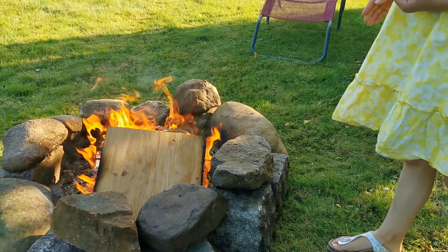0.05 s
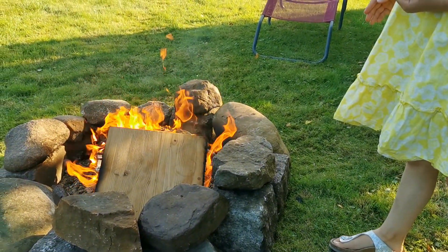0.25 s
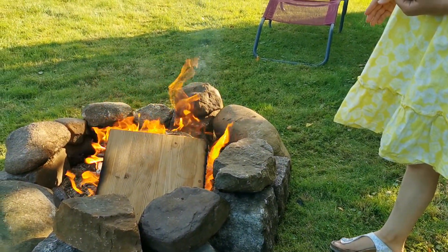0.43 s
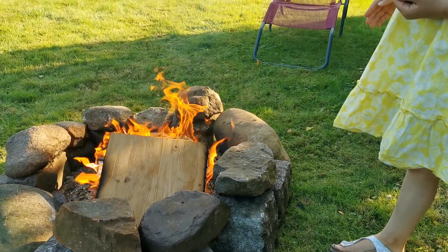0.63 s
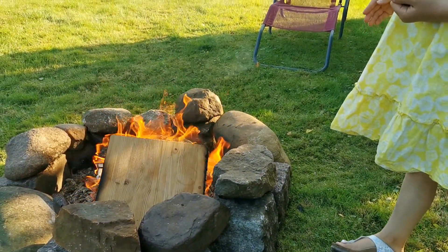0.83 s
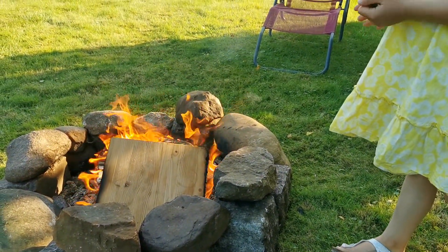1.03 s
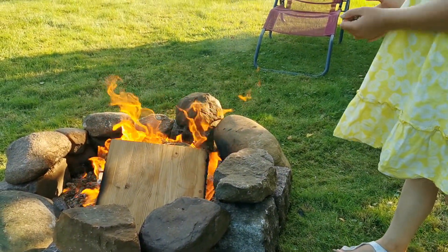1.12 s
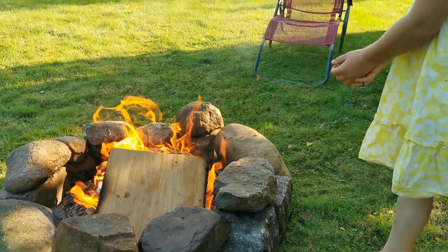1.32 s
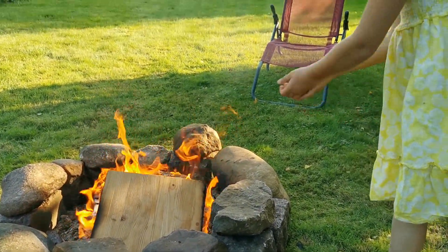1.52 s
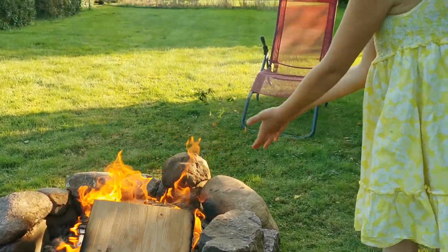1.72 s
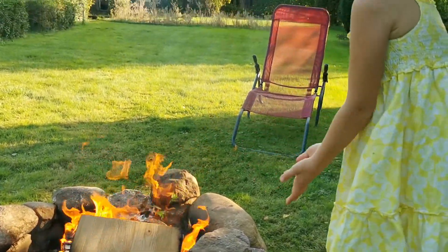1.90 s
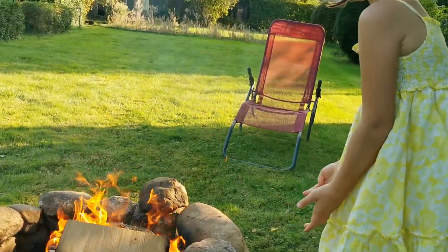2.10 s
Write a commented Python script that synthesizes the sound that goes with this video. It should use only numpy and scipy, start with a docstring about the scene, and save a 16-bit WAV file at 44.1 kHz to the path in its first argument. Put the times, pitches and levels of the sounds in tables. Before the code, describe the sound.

A wood fire crackles outdoors, with five loud snaps over low fluttering flames.

```python
"""Wood burns in a stone fire pit on a lawn, a couple of metres from the microphone.
Low fluttering flames and faint outdoor air sound throughout. Right at the start a puff of wind
bumps the microphone and small crackles begin to tick. Then steam splits the wood in five loud snaps:
each rattles briefly between the stones and comes back from the garden as a soft hiss.
A few of the thin ticks that follow are sharp, far echoes of the snaps."""
import sys
import numpy as np
from scipy import signal
from scipy.fft import rfft, irfft
from scipy.io import wavfile
from scipy.ndimage import uniform_filter1d

SR = 44100
rng = np.random.default_rng(int(sys.argv[2]) if len(sys.argv) > 2 else 0)


def unload_wav(signal):
    """Save mono or channel-first audio to the path in sys.argv[1] as 16-bit WAV at rate SR, clipped to [-1, 1]."""
    wavfile.write(
        sys.argv[1],
        SR,
        np.round(np.clip(np.atleast_2d(signal).T, -1, 1) * 32767).astype(np.int16),
    )


N = 94815
CRACK_SAMPLES, LEAD_S = 2048, 128 / SR  # a crack's length, and the quiet lead-in before it hits
CRACK_HZ = np.fft.rfftfreq(CRACK_SAMPLES, 1 / SR)


def amp(db):
    """Turns decibels into a gain."""
    return 10 ** (np.asarray(db) / 20)


def look_up(table, hz):
    """Reads a table at any pitch, drawing straight lines between its rows on a log scale."""
    pitch_hz, *columns = np.transpose(table)
    return np.array([np.interp(np.log(hz + 1), np.log(pitch_hz + 1), c) for c in columns])


def unit_level(x):
    """Scales a signal to an average (rms) level of 1."""
    return x / np.sqrt(np.mean(x ** 2) + 1e-20)


def add(mix, start_s, sound):
    """Mixes a stereo sound in at a given time."""
    part = mix[:, max(round(start_s * SR), 0):][:, :sound.shape[1]]
    part += sound[:, :part.shape[1]]


# The tone of the flames and air: pitch_hz, left_db, right_db
AIR_TONE = [(20, -37, -36.5), (45, -34.5, -37.5), (80, -38.5, -38.5), (130, -40.5, -40.5),
            (231.8, -44.5, -44), (332, -56, -59), (450, -61.5, -55.5), (800, -58.5, -55.5),
            (1400, -68.5, -62.5), (2800, -70, -64), (4200, -69, -69.5), (6700, -68, -65),
            (8000, -73, -77.5), (11000, -77, -68.5), (15500, -79.5, -67.5)]
# How alike the two sides sound: pitch_hz, likeness (0 to 1)
AIR_LIKENESS = [(25, 1), (60, .77), (130, 1), (290, 0.88), (640, .28), (1400, 0)]
# How the low rumble rises and falls: time_s, boost_db
RUMBLE_SWELLS = [(0, 4.5), (.2, 3), (.35, -3), (.9, -1), (1.2, -3), (1.5, 0.5), (1.8, -7), (2.0, 3),
                 (2.15, 1.5)]

def flames_and_air():
    """Flames make a fluttering rumble, alike on both sides, under the faint hiss of the air."""
    hz, t, noise = signal.stft(rng.standard_normal((2, N)), SR, nperseg=1024, noverlap=768)
    likeness = look_up(AIR_LIKENESS, hz).T
    noise[1] = likeness * noise[0] + np.sqrt(1 - likeness ** 2) * noise[1]
    flutter = uniform_filter1d(rng.standard_normal(noise.shape[1:]), size=6, axis=1)  # smooth in time
    flutter_db = 1.66 * unit_level(uniform_filter1d(flutter, size=5, axis=0))  # and in pitch
    swell_db = np.interp(t, *np.transpose(RUMBLE_SWELLS))
    bass_only = 1 / (1 + (hz[:, None] / 360) ** 2)
    level_db = look_up(AIR_TONE, hz)[:, :, None] + bass_only * (flutter_db + swell_db)
    return signal.istft(noise * amp(level_db), SR, nperseg=1024, noverlap=768)[1][:, :N]


def wind_puff(peak_s=0.058, width_s=0.039, pitch_hz=43.6, left_db=-50, right_db=-39):
    """Wind bumps the microphone: a short, deep rumble, different on each side."""
    t, hz = np.arange(N) / SR, np.fft.rfftfreq(N, 1 / SR)
    noise = rfft(rng.standard_normal((2, N)))
    rumble = irfft(noise * hz / (1 + (hz / pitch_hz) ** 4), N)
    swell = np.exp(-((t - peak_s) / width_s) ** 2)
    return unit_level(rumble) * swell * amp([[left_db], [right_db]])


def quick_filter(tone_db):
    """The filter with this tone that rings most briefly (minimum phase)."""
    cepstrum = irfft(np.log(amp(tone_db)))
    cepstrum[..., 1:CRACK_SAMPLES // 2] *= 2
    cepstrum[..., CRACK_SAMPLES // 2 + 1:] = 0
    return np.exp(rfft(cepstrum))


# How the stone pit colours each crack: pitch_hz, left_db, right_db
PIT_TONE = [(80, -20.5, -23.5), (235, -8.5, -7.5), (395, -29.5, -24), (640, -5.5, 0.5), (1072, 5, 4),
            (1380, -11.5, -6), (1580, -8.5, 2.5), (1960, -0.5, -11), (2350, -11, 6.5), (2650, -0.5, -9.5),
            (3000, -6.5, 2), (4500, 1.5, 3), (5500, 2.2, 6), (6700, -3.5, 5.5), (7500, -0.5, -7.64),
            (8910, -2, -2.5), (10600, -15, 4.5), (12730, -19.5, -0.9), (15500, -14, -3)]

def wood_crack(tone_db, tear_s=0.00041, rattle_s=0.0013, bounce_s=0.00148, right_lag_s=0.0001):
    """A jump in pressure and tearing fibres, scattered by the stones, with one bounce."""
    t, hz = np.arange(CRACK_SAMPLES) / SR, CRACK_HZ
    tear = t / tear_s * np.exp(1 - t / tear_s)
    rattle = amp(-5.5) * np.exp(-t / rattle_s)
    shape = tear + rattle
    scatter = rfft(rng.standard_normal((2, CRACK_SAMPLES)) * shape / np.linalg.norm(shape))
    bass_cut = (1j * hz / (2330 + 1j * hz)) ** 2
    burst = 1 + amp(10.5) * scatter * bass_cut  # the 1 is the jump in pressure
    # Even out the burst's own tone, so the pit and tone_db set the colour.
    power = uniform_filter1d(abs(burst) ** 2, round(405.5 / hz[1]), axis=1)
    colour = quick_filter(look_up(PIT_TONE, hz) + tone_db - 10 * np.log10(power + 1e-9))
    bounce = 1 - 0.2 * np.exp(-2j * np.pi * hz * bounce_s)
    delay = np.exp(-2j * np.pi * hz * (LEAD_S + np.array([[0], [right_lag_s]])))
    return irfft(burst * bounce * delay * colour)


# Small crackles in the wood and sharp far echoes of the snaps: start_s, level_db, pitch_hz
THIN_TICKS = [(0.03, -23, 10000), (0.0438, -37.5, 9000), (.5380, -19.5, 5180), (.5515, -28.5, 4920),
              (0.7247, -35.5, 12020), (0.891, -38.5, 6960), (0.9043, -41.5, 10000), (0.969, -49.5, 7000),
              (1.2273, -37.5, 6600), (1.337, -31.5, 8300), (1.4068, -39, 6000), (1.595, -37.5, 7370),
              (2.0165, -28.5, 4535), (2.0790, -31.5, 6300), (2.081, -32, 6900)]

def thin_ticks(faint_per_s=12, faint_db=-45.5, spread_db=6, faint_hz=8300, half_width_octaves=0.7):
    """Small crackles and far echoes of the snaps, with faint ticks scattered at random among them."""
    out = np.zeros((2, N))
    draws = rng.random((round(faint_per_s * N / SR), 3))
    faint = [(when * N / SR, faint_db + spread_db * (2 * loud - 1), faint_hz * 2 ** (high - 0.5))
             for when, loud, high in draws]
    for start_s, level_db, pitch_hz in THIN_TICKS + faint:
        off_pitch = np.log2((CRACK_HZ + 1) / pitch_hz) / half_width_octaves
        add(out, start_s - LEAD_S, wood_crack(level_db - 10 * np.log10(1 + off_pitch ** 4)))
    return out


# A snap's seven bands, low to high (knock, body, clack, bite, edge, sting, top): pitch_hz
SNAP_BANDS = [230, 1000, 3300, 5900, 8400, 10800, 14000]
# Big splits in the wood; knock_db to top_db are boosts over the body's level:
# start_s, body_db, knock_db, clack_db, bite_db, edge_db, sting_db, top_db, echo_db, ring_hz, ring_db
BIG_SPLITS = [(0.2304, 1.5, -2.5, -1.5, 1.5, 1.7, 9, 4.5, 3, 6430, 7),
              (0.3895, 4, 0.5, 2.5, -1.5, -6, 4, -4.5, 5.5, 4850, 4.5),
              (1.0726, -3, -8.5, 2, -2.5, 0.5, 6.5, 1.5, -2.5, 8330, 2.5),
              (1.7370, -3, 4.5, -2.5, -3, 5, -7.5, 4, -3, 4900, 5),
              (1.891, -1.5, -1, -1, 2, 4.5, -9.5, 5.5, -0.5, 5730, 5.5)]

def snaps(ring_octaves=0.21):
    """Pockets of steam split the wood; each snap has its own tone, a brief ring and an echo."""
    out = np.zeros((2, N))
    for start_s, body_db, knock_db, *treble_db, echo_db, ring_hz, ring_db in BIG_SPLITS:
        bands = list(zip(SNAP_BANDS, [knock_db, 0] + treble_db))
        tone_db = body_db + look_up(bands, CRACK_HZ)
        off_pitch = np.log2((CRACK_HZ + 1) / ring_hz) / ring_octaves
        add(out, start_s - LEAD_S, wood_crack(tone_db + ring_db / (1 + off_pitch ** 2)))
        add(out, start_s, amp(echo_db) * garden_echo())
    return out


# The tone the garden sends back: pitch_hz, left_db, right_db
ECHO_TONE = [(300, -55.5, -51), (996, -32, -28), (1508, -34, -32), (2300, -22, -13.5), (3400, -16.5, -16),
             (5070, -11, -7.5), (6750, -7.5, -4.5), (8160, -13.5, -16.5), (10700, -18.5, -8.5),
             (15500, -22.5, -14)]
# How long the echo takes to fade by 60 dB: pitch_hz, fade_s
ECHO_FADE = [(1000, 0.43), (3000, 0.46), (6000, 0.43), (10000, 0.33), (15000, .25)]
# Stronger echoes from things around the lawn: delay_s, boost_db
LAWN_ECHOES = [(0.028, 2.5), (.112, 0.5), (.127, 2.5), (.163, 7.5), (.18, 6)]

def garden_echo(grass_fade_s=0.085, trees_s=0.02, rise_s=0.001954, last_hedge_s=0.27, width_s=0.0095):
    """A snap comes back as a hiss: first from the grass nearby, then from trees and hedges."""
    hz, t, noise = signal.stft(rng.standard_normal((2, SR // 2)), SR, nperseg=256)
    level_db = look_up(ECHO_TONE, hz)[:, :, None] - 60 * t / look_up(ECHO_FADE, hz).T
    hiss = signal.istft(noise * amp(level_db), SR, nperseg=256)[1]
    t = np.arange(hiss.shape[1]) / SR
    grass = amp(4 - 60 * t / grass_fade_s)
    trees = (1 + np.tanh((t - trees_s) / rise_s)) / 2
    ending = (1 - np.tanh((t - last_hedge_s) / 0.017)) / 2  # the hiss stops past the farthest hedge
    boost_db = sum(db * np.exp(-((t - delay_s) / width_s) ** 2) for delay_s, db in LAWN_ECHOES)
    shape = np.hypot(trees, grass) * ending * amp(boost_db)
    average_fade = amp(-60 * t / np.mean(ECHO_FADE, axis=0)[1])
    return hiss * shape / np.linalg.norm(shape * average_fade)


def scene():
    """The fire in the garden."""
    return flames_and_air() + wind_puff() + snaps() + thin_ticks()


def record(dry, cutoff_hz=16100):
    """Trims away the very highest treble."""
    treble_cut = signal.firwin(255, cutoff_hz, window=("kaiser", 9), fs=SR)
    return signal.oaconvolve(dry, treble_cut[None], "same")


dry = scene()
out = record(dry)
unload_wav(out)
```